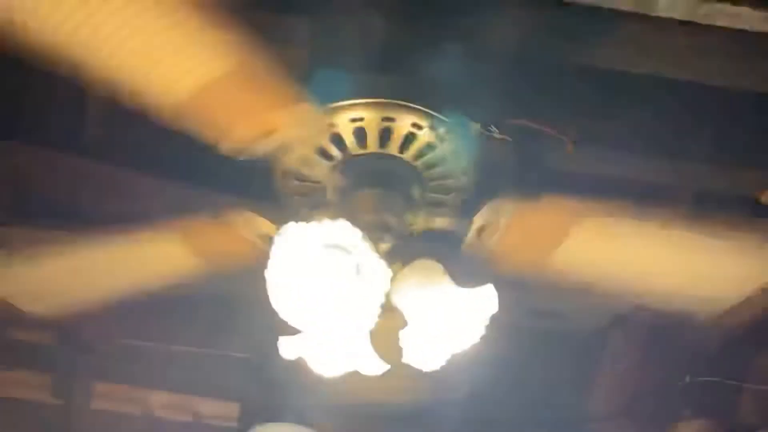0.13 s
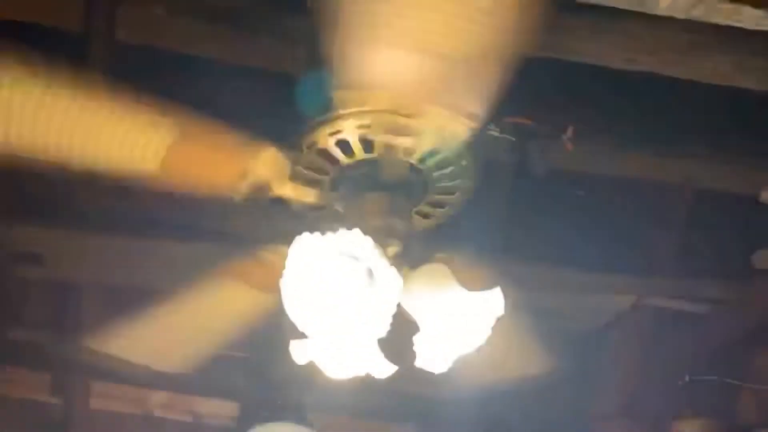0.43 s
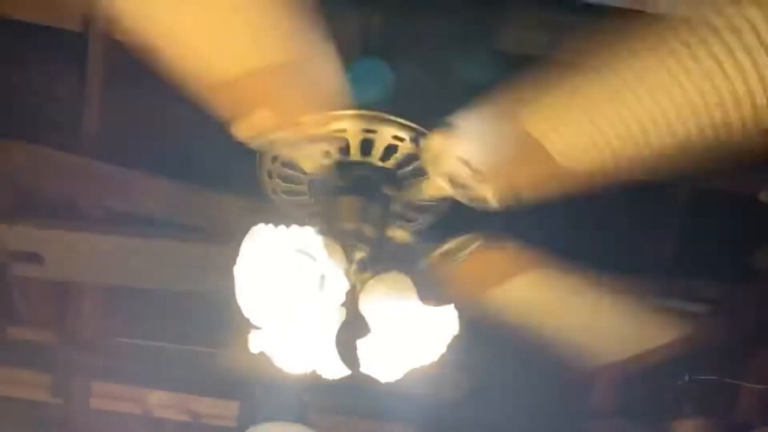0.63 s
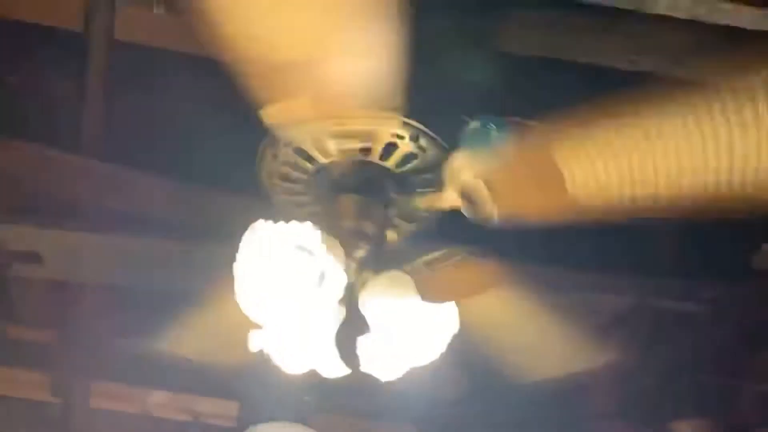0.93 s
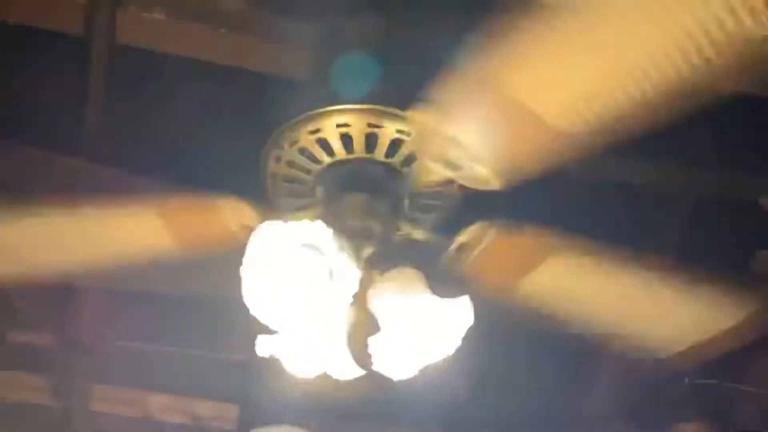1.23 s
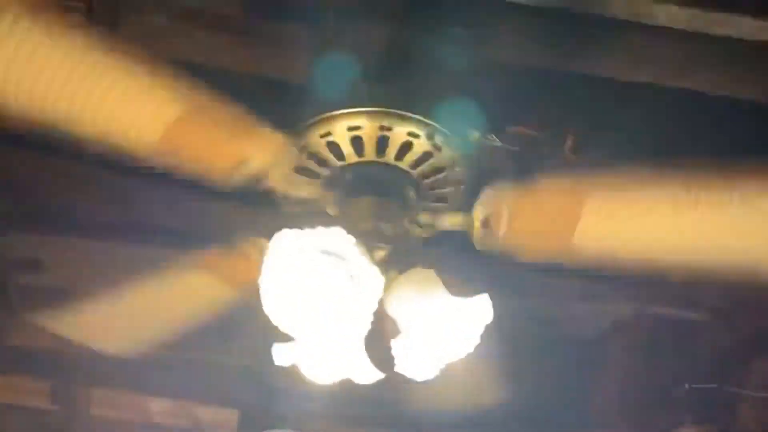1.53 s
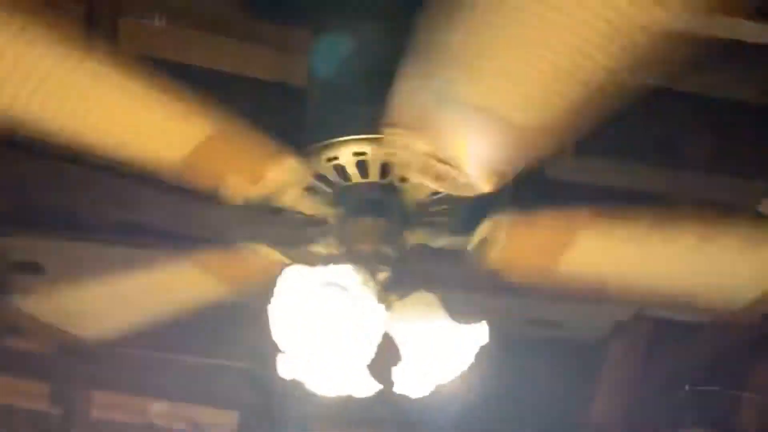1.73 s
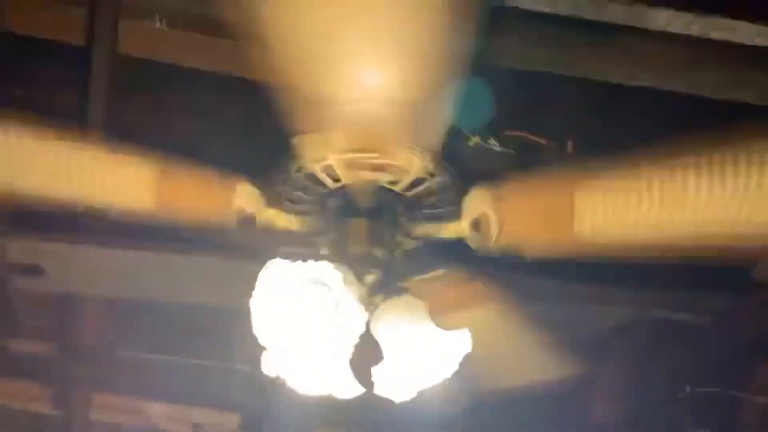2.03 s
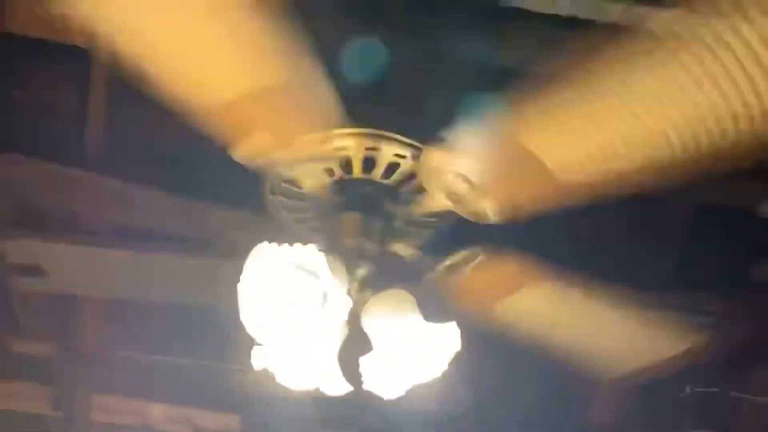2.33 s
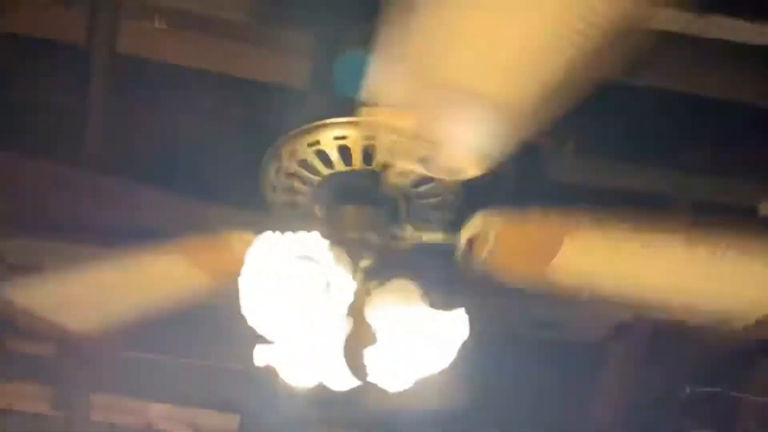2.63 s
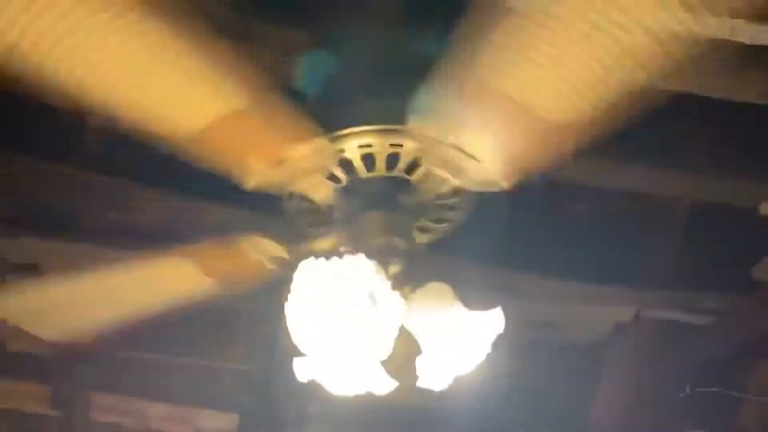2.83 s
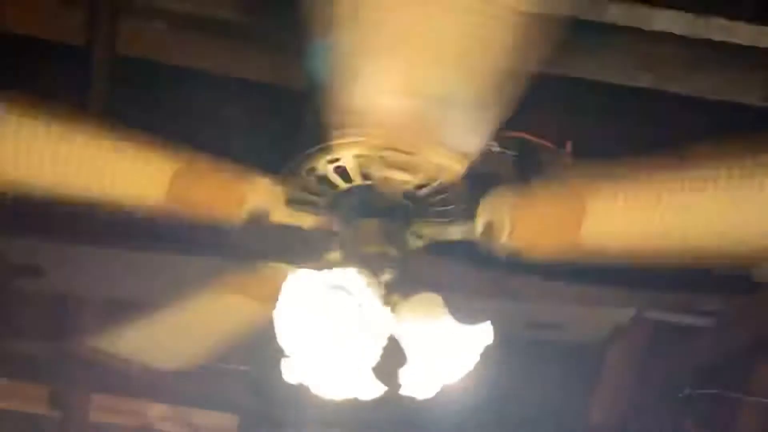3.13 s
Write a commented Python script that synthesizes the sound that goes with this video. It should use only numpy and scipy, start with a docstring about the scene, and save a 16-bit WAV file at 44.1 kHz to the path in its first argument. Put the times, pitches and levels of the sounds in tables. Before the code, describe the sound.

A wobbling ceiling fan clinks and ticks in quick steady rhythm over low humming air.

```python
"""Rocking ceiling fan

An unbalanced ceiling fan rocks its light fitting about three times a second. Three loose parts, probably
the glass shades, clink in turn: contact noise excites damped modes. The hardware ticks, mostly just before
the third. Below lie blade air and swish (filtered noise) and motor hum (wavering sinusoids).
A phone hears it all in a small room through two ports."""
import sys
import numpy as np
from scipy import signal
from scipy.fft import rfft, irfft
from scipy.io import wavfile
from scipy.ndimage import uniform_filter1d

SR = 44100
rng = np.random.default_rng(int(sys.argv[2]) if len(sys.argv) > 2 else 0)


def waveform_to_disk(signal):
    """Save audio, clipped to [-1, 1], as 16-bit WAV at the path in sys.argv[1]."""
    frames = np.transpose(np.atleast_2d(signal))
    scaled = np.clip(frames, -1, 1) * 32767
    samples = np.round(scaled).astype(np.int16)
    wavfile.write(sys.argv[1], SR, samples)


N = 144207

# Spectral density of the moving air: f/Hz, relative level/dB per Hz
AIR_SPECTRUM = [(20, -15), (33, -11.5), (48, 0), (62, 2), (80, -0.5), (100, -2.5), (135, -7.5),
                (200, -12.5), (310, -12.5), (500, -19), (850, -26.5), (1150, -28.5), (1550, -35),
                (3500, -48.5), (9000, -45), (16000, -76)]
# Side signal of the air against its mid: f/Hz, level/dB
AIR_SIDE_LEVEL = [(50, -28), (120, -9), (300, -11), (600, -5), (1200, -3.5), (4000, 4)]
# Rumble and hum through one turn, a lull then a surge as the fan swings back: t/s into the turn, level/dB
TURN_SURGE = [(.06, 1.5), (.11, -5), (.165, -5), (.19, 3.5), (.3, 0)]
# Motor hum before waver and surge: f/Hz, rms level/dB
HUM_PARTIALS = [(59.5, -68), (117, -55.5), (120, -59), (232, -69.5)]
# Dry ticks of loose hardware: t/s, relative level/dB, treble tilt/(dB per octave), chatter decay/s
HARDWARE_TICKS = [(0.005, -26.5, -3, 0.0031), (0.0148, -22, -0.5, 0.0013), (.110, -32, -3.5, 0.0066),
                  (0.3686, -21.5, 3, 0.0038), (0.3737, -22.5, 14, 0.0025), (0.717, -21, 0.5, 0.0031),
                  (0.722, -30, 7, 0.0024), (1.0523, -25, 5, 0.0042), (1.0624, -34, -6, 0.0057),
                  (1.339, -26, 11, 0.0093), (1.741, -21.5, 0, .0015), (1.836, -34, -3.5, 0.0034),
                  (2.098, -24.5, 4.5, .003), (2.108, -28, -3.5, 0.005), (2.48, -20, -2, 0.0042),
                  (2.777, -25.5, -2, 0.0016), (2.792, -32.5, -3.5, .003), (3.189, -19, 0.5, 0.0026)]
# Knocks of each shade: t/s, relative level/dB, treble tilt/(dB per octave), low ring level/dB, chatter decay/s
FIRST_KNOCKS = [(0.189, -11.5, 2, -6, 0.0051), (0.5267, -16.5, -1, -4, 0.0011),
                (0.884, -13, 2.5, -4.5, 0.0038), (1.2272, -12.5, 1.5, -0.5, 0.0073),
                (1.5706, -14, -0.5, -7.5, 0.0051), (1.916, -14, 1.5, -7, 0.004),
                (2.2595, -15, 1, 1.5, 0.0016), (2.602, -12, 0, -8, 0.0045), (2.9551, -15, 2, 1.5, 0.0022)]
SECOND_KNOCKS = [(0.2835, -22, 0.014, 2, 0.025), (0.637, -23.5, 0.29, -4, 0.011),
                 (0.9789, -21, 0.13, 0.0, 0.016), (1.3233, -24, -0.055, 0.0, 0.0025),
                 (1.6815, -19.5, -1.1, -6, 0.032), (2.0135, -23, 0.012, -1, 0.0019),
                 (2.3676, -23.5, -0.087, -1, 0.016), (2.7192, -22, -0.29, 1, 0.015),
                 (3.0641, -21, -0.12, 1, 0.01)]
THIRD_KNOCKS = [(0.042, -15.5, -0.64, -2, 0.0086), (0.387, -13, -0.15, -3, 0.0045),
                (0.739, -14, -0.34, 1, 0.0032), (1.0927, -11.5, 0.47, 5, 0.006),
                (1.4272, -14.5, -0.55, -2, 0.0014), (1.774, -15.5, -0.66, -6.5, 0.0038),
                (2.126, -13, 0.42, 3.5, 0.0043), (2.4693, -17, -0.54, 2, 0.012),
                (2.818, -16, -0.49, -2.5, 0.0044), (3.1695, -12.5, 0.37, -3.5, 0.005)]
# Strong modes of each shade: f/Hz, relative level/dB
FIRST_SHADE_MODES = [(1927, 6.5), (2147, -2), (2734, 15), (2810, 20.5), (3116, 5.5), (4129, 0.5),
                     (4720, -10), (5098, -8), (5631, -5), (6750, 6.5), (6912, -15), (8301, 16.5),
                     (8505, 12.5), (8704, 15), (9576, 12.5), (10987, 8.5), (11094, 18), (11353, -15),
                     (11697, 15.5), (12435, 15), (13404, 0), (14389, 18), (14798, -4), (15590, -5)]
SECOND_SHADE_MODES = [(1981, 11), (2067, 12.5), (2760, 4), (2901, 9), (3984, 11), (4180, 1), (4640, -7),
                      (5615, 0), (5954, -13.5), (6621, 13.5), (6724, 13), (7628, 18), (8236, 20),
                      (8548, 26), (8645, 21.5), (8860, 23), (9006, 15), (9383, -6), (11358, 16),
                      (11514, 15), (11697, 17), (12010, 5), (12295, 4), (13888, -3), (14804, 4),
                      (15202, 19), (15299, 22.5)]
THIRD_SHADE_MODES = [(2153, 7.5), (2691, 15), (2858, 7.5), (3122, 15.5), (3246, -0.5), (4059, 3),
                     (4301, -2.5), (4770, -2), (5200, -5.5), (5572, 0.5), (6158, 2.5), (6944, 5.5),
                     (7800, 18.5), (8591, 20), (9232, 11), (9458, 0), (9582, -3), (11030, 25), (11380, 19),
                     (11590, 12.5), (11880, 11), (12101, -1), (13587, 16), (13867, -2), (14211, 9),
                     (14728, 20)]
# Colour of the contact noise: f/Hz, relative level/dB
FIRST_CONTACT = [(1500, -28), (2300, -23), (2750, -5), (3500, -19.5), (4500, -19), (5500, -15), (7200, -7),
                 (8500, 1), (9600, 0), (10300, -1), (11300, -1), (13200, -2), (14600, 4.5), (15500, -2),
                 (16300, -6)]
SECOND_CONTACT = [(1500, -21), (2300, -16.5), (2750, 3), (3500, -29), (5500, -26.5), (7200, -11.5),
                  (8500, -6), (9600, -3), (10300, 0.5), (11300, 5.5), (13200, -0.5), (14600, 10.5),
                  (15500, 2), (16300, -14)]
THIRD_CONTACT = [(1500, -20), (2300, -14.5), (2750, -14), (3500, -21), (5500, -18.5), (7200, -2),
                 (8500, 5.5), (9600, 3.5), (10300, 1.5), (11300, 6.5), (13200, 2), (14600, 12), (15500, -9),
                 (16300, -11)]
HARDWARE_CONTACT = [(1500, -26.5), (2300, -15), (2750, -10), (3500, -16.5), (5500, -7), (7200, -5),
                    (8500, -2), (10000, -4.5), (11300, 6), (13200, -0.5), (14600, -2), (15500, 5),
                    (16300, -12)]
# Ring time of the modes, before each shade's own scale factor: f/Hz, 60 dB decay time/s
MODE_T60 = [(2000, 0.49), (2800, 0.22), (4000, 0.19), (6000, 0.12), (8500, 0.14), (11000, 0.099),
            (15000, 0.044)]
# Sound arriving from all around: f/Hz, share of power (0-1)
DIFFUSE_SHARE = [(2000, 0.22), (2800, 0.2), (3100, 0.15), (4000, 1), (5500, 0.77), (6600, 0.06), (7400, 1),
                 (8500, 0.19), (9500, 0), (11000, 0.04), (12000, 0), (13200, 0.03), (14500, 0.4),
                 (15500, 0.8)]
# Phase by which the right port lags the left: f/Hz, lag/rad
PORT_PHASE_LAG = [(2000, 0.4), (2750, -1.5), (3050, -2.5), (5000, -4), (5600, 0), (7100, 0.6), (7800, 1.5),
                  (9200, 3), (10300, 3.5), (11000, 4.5), (12400, 5.5), (13700, 5.5), (15000, 8),
                  (15700, 12)]

TURN_S = 0.3465  # period of the rocking
AIR_DB, GUST_DB, GUST_S, EDDY_DB = -46, 1.5, 0.26, 1.26  # periodic swell, its peak time, random eddies
RUMBLE_HZ = 170  # the surge acts on the air below this
SWISH_DB, SWISH_HZ, SWISH_WIDTH_OCT = -58, 990, 0.33  # level before its envelope and flutter
SWISH_S, SWISH_LENGTH_S = 0.155, 0.028  # centre within the turn, Gaussian width
ATTACK_S, SCUFF_S = 0.00094, 0.003
ROOM_T60_S = 0.24
RIPPLE_DB, RIPPLE_HZ = 7, 209  # short contact resonances: scale of their random levels, spacing
MODE_SCATTER_DB, CROWD_SCATTER_DB = 0.5, 5  # random spread from knock to knock
BEAT_HZ, TWIN_DB = 49.8, -6.5  # scale of the pair spacing, level of the weaker twin
CROWD_DB, CROWD_TILT_DB = -11, -1  # weak modes: level against the contact colour, dB per octave
RING_RISE_S = 0.002
LOW_RING_HZ, LOW_RING_WIDTH_HZ = 2620, 370  # modes here vary with the place of the knock
TOP_HZ = 15700


def amp(db):
    """Logarithmic level: decibels to amplitude ratio."""
    return 10 ** (np.asarray(db) / 20)


def at(table, hz):
    """Interpolation of a (f/Hz, value) table on a logarithmic frequency axis."""
    f, v = np.array(table, float).T
    return np.interp(np.log(np.maximum(hz, 1)), np.log(f), v)


def unit(x):
    """Normalization to unit rms."""
    return x / np.sqrt(np.mean(x ** 2))


def walk(rate):
    """Low-pass noise: held random values at `rate` Hz, smoothed twice and scaled to rms 1."""
    k = int(SR / rate)
    held = np.repeat(rng.standard_normal(N // k + 1), k)
    smooth = uniform_filter1d(uniform_filter1d(held, k), k)
    return unit(smooth[:N])


def surge():
    """Periodic amplitude modulation of the low sounds as the fan rocks through each turn."""
    return amp(np.interp(np.arange(N) / SR, *np.array(TURN_SURGE).T, period=TURN_S))


def rush(gain):
    """Broadband flow noise: random mid and side spectra shaped by `gain`, as stereo of rms 1."""
    hz = np.fft.rfftfreq(N, 1 / SR)
    mid, side = rfft(rng.standard_normal((2, N))) * gain
    side = side * amp(at(AIR_SIDE_LEVEL, hz))
    return unit(irfft(mid + np.array([[1], [-1]]) * side, N))


def air():
    """Modulated flow noise: a surging rumble, a swelling rush and a soft band of swish once a turn."""
    t, hz = np.arange(N) / SR, np.fft.rfftfreq(N, 1 / SR)
    flow = amp(AIR_DB) * rush(amp(at(AIR_SPECTRUM, hz)))
    rumble = irfft(rfft(flow) / (1 + (hz / RUMBLE_HZ) ** 4), N)
    gust_db = GUST_DB * np.cos(2 * np.pi * (t - GUST_S) / TURN_S)
    swell = amp(gust_db + EDDY_DB * walk(18))

    octaves = np.log2(np.maximum(hz, 1) / SWISH_HZ)
    band = np.exp(-.5 * (octaves / SWISH_WIDTH_OCT) ** 2)
    swish = amp(SWISH_DB + 2 * walk(8.19)) * rush(band)
    from_swish = (t - SWISH_S + TURN_S / 2) % TURN_S - TURN_S / 2
    swish_env = np.exp(-.5 * (from_swish / SWISH_LENGTH_S) ** 2)
    return surge() * rumble + swell * (flow - rumble) + swish * swish_env


def motor(waver_db):
    """Superposition of mains-hum sinusoids, each with random amplitude and phase modulation."""
    t = np.arange(N) / SR
    hum = np.zeros(N)
    for hz, db in HUM_PARTIALS:
        level = np.sqrt(2) * amp(db + waver_db * walk(6.15))
        phase = 2 * np.pi * (hz * t + rng.random()) + 0.62 * walk(6.18)
        hum += level * np.sin(phase)
    return hum


def add(out, sound, start):
    """Linear superposition of a stereo sound at `start` seconds, its last quarter faded out."""
    i, length = int(round(start * SR)), sound.shape[1]
    lo, hi = max(i, 0), min(i + length, N)
    faded = sound * np.minimum(np.linspace(4, 0, length), 1)
    out[:, lo:hi] += faded[:, lo - i:hi - i]


def ports(direct, around, hz):
    """Interaural-style phase: direct sound lags at the right port, diffuse sound is independent in each."""
    share = np.clip(at(DIFFUSE_SHARE, hz), .01, .99)
    lag = np.exp(-1j * at(PORT_PHASE_LAG, hz) * np.array([[0], [1]]))
    return np.sqrt(1 - share) * direct * lag + np.sqrt(share) * around


def onset(scuff_db, size=12288):
    """Impact onset: the parts touch and scuff for a moment before they strike; gives time and attack."""
    t = np.arange(size) / SR - SCUFF_S
    strike = np.clip(t / ATTACK_S + 1, 0, 1)
    return t, np.maximum(strike, amp(scuff_db) * (t < 0))


def tilted(hz, tilt_db):
    """Contact hardness as a spectral slope about 11 kHz, level below 1.5 kHz."""
    return amp(tilt_db * np.log2(np.maximum(hz, 1500) / 11000))


def click(colour, tilt_db, chatter_s, room_db, scuff_db):
    """Contact excitation: decaying chatter noise through uneven resonances, with the room's decay as tail."""
    t, attack = onset(scuff_db)
    age, hz = np.maximum(t, 0), np.fft.rfftfreq(len(t), 1 / SR)
    chatter = np.exp(-age / max(chatter_s, .0005))
    room = amp(room_db) * np.exp(-np.log(1000) * age / ROOM_T60_S)
    env = attack * np.hypot(chatter, room)
    # uneven steps of 32 samples that even out with age
    steps = np.repeat(rng.standard_normal(len(t) // 32), 32)
    env = env * amp(2.5 * steps * np.exp(-age / .03))
    noise = rfft(rng.standard_normal((3, len(t))) * env / np.linalg.norm(env))

    bumps = rng.uniform(-1.5, 1, size=256) * np.sqrt(3)
    ripple = unit(amp(RIPPLE_DB * np.interp(hz / RIPPLE_HZ, np.arange(len(bumps)), bumps)))
    low_cut = 1 / np.hypot(1, (900 / np.maximum(hz, 1)) ** 2)
    gain = amp(at(colour, hz)) * ripple * tilted(hz, tilt_db) * low_cut
    return irfft(ports(noise[0], noise[1:], hz) * gain)


def hardware(click_db, room_db, scuff_db):
    """Impact without modal resonance: loose screws and brackets tick but do not ring."""
    out = np.zeros((2, N))
    for start, db, tilt_db, chatter_s in HARDWARE_TICKS:
        tick = click(HARDWARE_CONTACT, tilt_db, chatter_s, room_db, scuff_db)
        add(out, amp(db + click_db) * tick, start - SCUFF_S)
    return out


def shade(knocks, modes, colour, click_db, ring_db, room_db, ring_scale, scuff_db, count=72):
    """Modal superposition: each knock clicks and excites damped modes, in beating pairs over a weak crowd."""
    out, (t, attack) = np.zeros((2, N)), onset(scuff_db)
    main_hz, main_db = np.array(modes, float).T
    spacing = BEAT_HZ * rng.uniform(0.35, 2.026, len(modes)) * np.sqrt(main_hz / 5000)
    twin_hz = main_hz + spacing * rng.choice([-1, 1], len(modes))
    crowd_hz = 3900 + 11700 * (np.arange(count) + rng.random(count)) / count
    crowd_slope_db = CROWD_TILT_DB * np.log2(crowd_hz / crowd_hz.mean())
    crowd_db = at(colour, crowd_hz) + CROWD_DB + crowd_slope_db
    hz = np.concatenate([main_hz, twin_hz, crowd_hz])
    mode_db = np.concatenate([main_db, main_db + TWIN_DB, crowd_db])
    # twins scatter as widely as the crowd
    scatter_db = np.where(np.arange(len(hz)) < len(modes), MODE_SCATTER_DB, CROWD_SCATTER_DB)
    low = np.exp(-.5 * ((hz - LOW_RING_HZ) / LOW_RING_WIDTH_HZ) ** 2)

    tau = ring_scale * at(MODE_T60, hz) / np.log(1000)
    phase = (2 * np.pi * hz[:, None] * t).astype(np.float32)
    rise = 1 - np.exp(-np.maximum(t + ATTACK_S, 0) / RING_RISE_S)
    decay = np.exp(-np.maximum(t, 0) / tau[:, None])
    fade = (attack * rise * decay).astype(np.float32)
    rings = np.vstack([fade * np.cos(phase), fade * np.sin(phase)])

    for start, db, tilt_db, low_ring_db, chatter_s in knocks:
        knock_db = mode_db + low_ring_db * low + scatter_db * rng.standard_normal(len(hz))
        size = amp(knock_db) * tilted(hz, tilt_db) * 2 / (tau * SR)
        # diffuse sound blurs the lag between the ports
        blur = np.sqrt(2 * np.abs(at(DIFFUSE_SHARE, hz))) * rng.standard_normal(len(hz))
        lag = at(PORT_PHASE_LAG, hz) + blur
        start_phase = 2 * np.pi * rng.random(len(hz)) - lag * np.array([[0], [1]])
        struck = size * np.exp(1j * start_phase)
        ring = np.hstack([struck.real, -struck.imag]).astype(np.float32) @ rings
        contact = click(colour, tilt_db, chatter_s, room_db, scuff_db)
        sound = amp(click_db) * contact + amp(ring_db) * ring
        add(out, amp(db) * sound, start - SCUFF_S)
    return out


def scene():
    """Superposition of the air, the motor, the hardware and the three shades."""
    lean_db = 0.28  # air and hum lean to the left
    bed = (air() + surge() * motor(waver_db=3.0)) * amp([[lean_db], [-lean_db]])
    ticks = hardware(click_db=24.0, room_db=-8.5, scuff_db=-13)
    third = shade(THIRD_KNOCKS, THIRD_SHADE_MODES, THIRD_CONTACT, click_db=16.0, ring_db=13.5,
                  room_db=-12.0, ring_scale=1.29, scuff_db=-9.5)
    first = shade(FIRST_KNOCKS, FIRST_SHADE_MODES, FIRST_CONTACT, click_db=19, ring_db=15.5,
                  room_db=-12.5, ring_scale=0.96, scuff_db=-9)
    second = shade(SECOND_KNOCKS, SECOND_SHADE_MODES, SECOND_CONTACT, click_db=22, ring_db=18,
                   room_db=-1.5, ring_scale=1.45, scuff_db=0)
    return bed + ticks + third + first + second


def record(dry):
    """Band limitation: the phone cuts the top with a steep elliptic low-pass."""
    low_pass = signal.ellip(8, .2, 70, TOP_HZ, fs=SR, output="sos")
    return signal.sosfilt(low_pass, dry)


dry = scene()
out = record(dry)
waveform_to_disk(out)
```